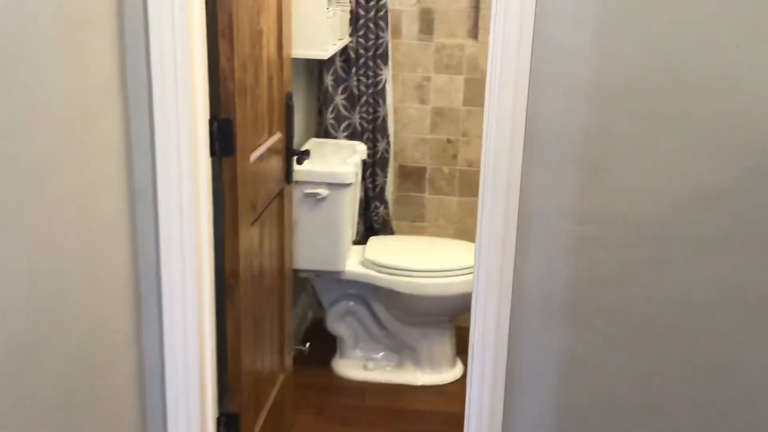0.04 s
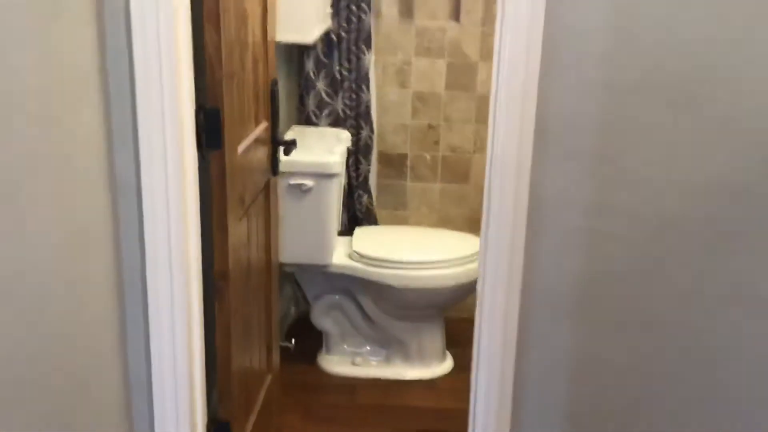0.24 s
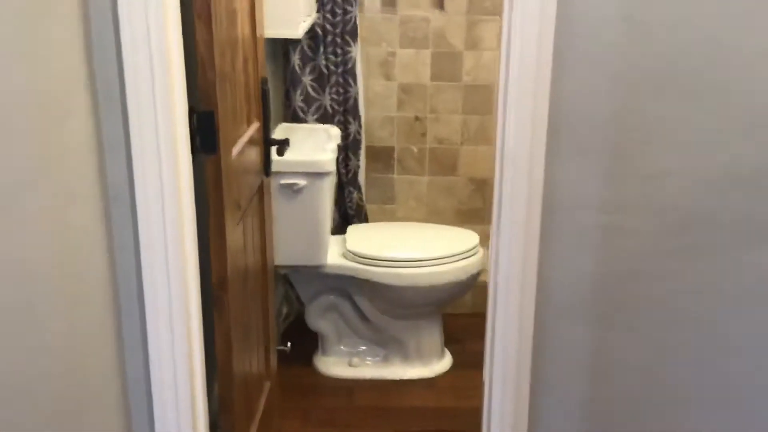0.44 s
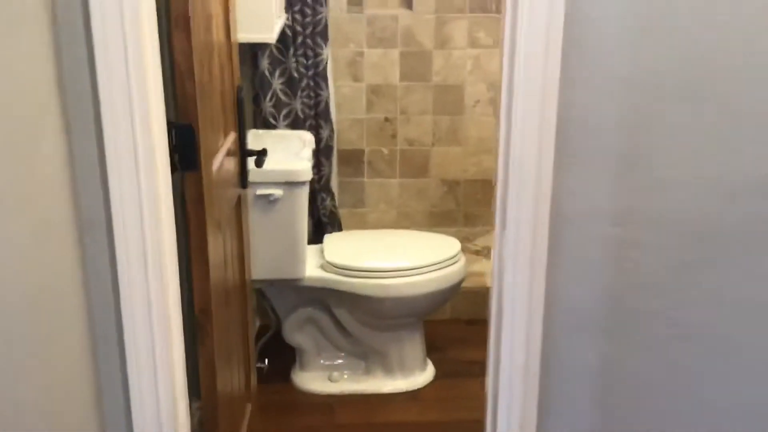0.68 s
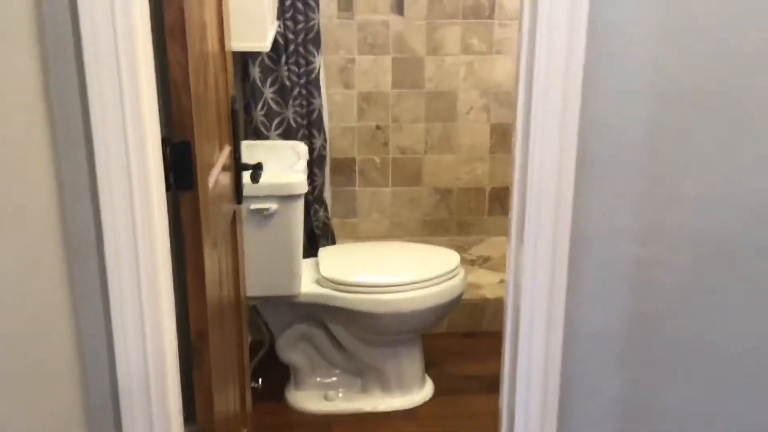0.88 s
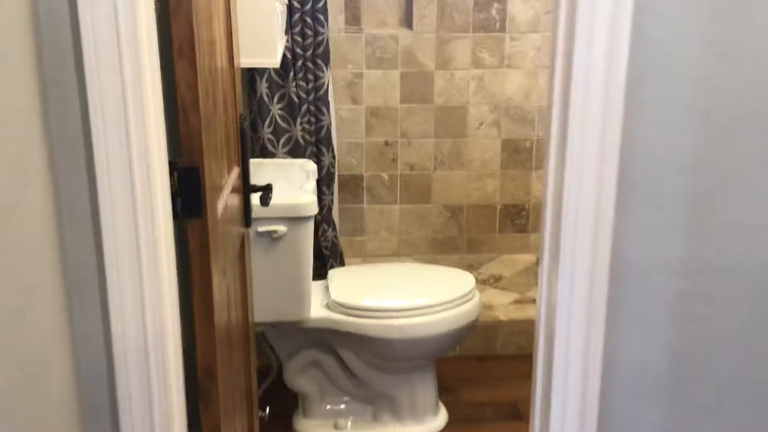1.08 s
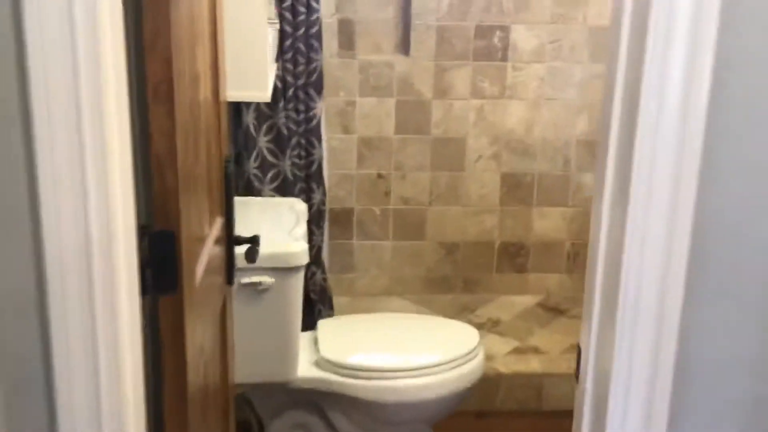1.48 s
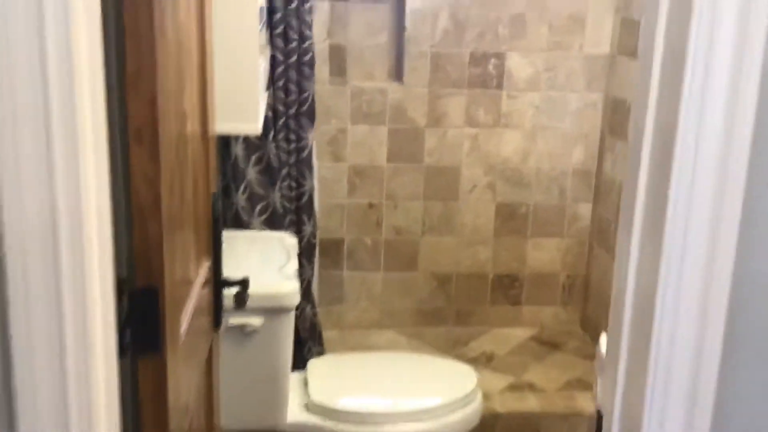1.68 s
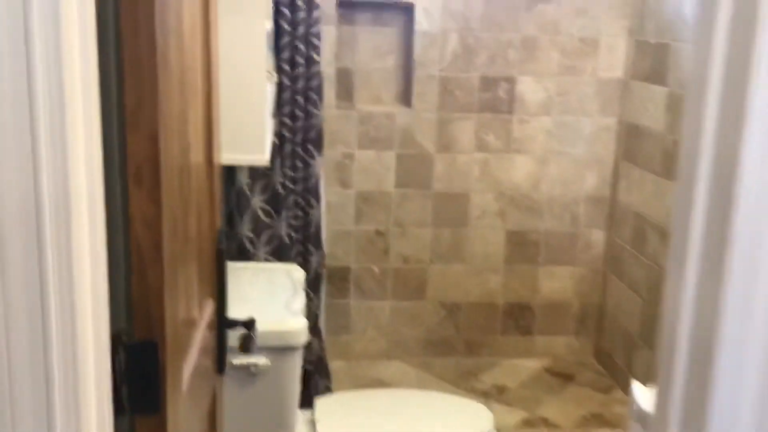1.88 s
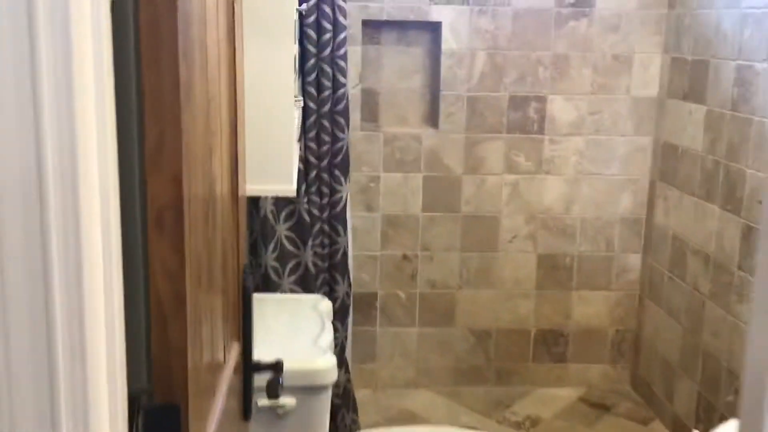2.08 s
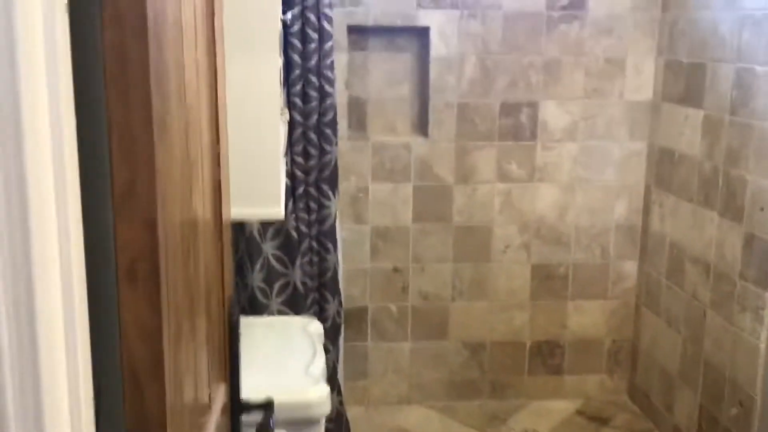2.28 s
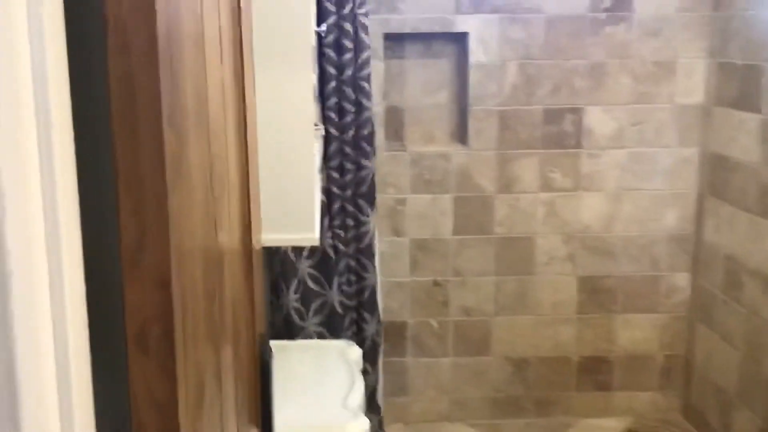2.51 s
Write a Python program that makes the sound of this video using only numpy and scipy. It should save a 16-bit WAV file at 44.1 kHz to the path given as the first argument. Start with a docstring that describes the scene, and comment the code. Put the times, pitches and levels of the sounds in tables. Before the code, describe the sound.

A few slow, booming steps on floorboards echo off bare walls, with light finger taps.

```python
"""Slow steps in an empty house

Three steps on a wooden floor: heel and ball make the boards boom, one board cracks,
and the bare walls ring on. Fingers tick and bump on a hand-held camera, dry and close.
Clothes rustle faintly over a low room rumble and a little microphone hiss."""
import sys
import numpy as np
from scipy import signal
from scipy.fft import rfft, irfft, next_fast_len
from scipy.io import wavfile

SR = 44100
rng = np.random.default_rng(int(sys.argv[2]) if len(sys.argv) > 2 else 0)


def wav_out(sig):
    """Save sig, one row per channel (or a flat mono array), as 16-bit PCM at SR to the path in sys.argv[1]."""
    wavfile.write(sys.argv[1], SR, np.round(np.clip(np.atleast_2d(sig).T, -1, 1) * 32767).astype(np.int16))


N = 116865


def amp(db):
    """Turn decibels into a gain."""
    return 10 ** (np.asarray(db) / 20)


def unit(x):
    """Scale a sound to an average (rms) level of 1."""
    return x / np.sqrt(np.mean(x ** 2) + 1e-20)


def along(points, hz):
    """Read between (frequency, value) points on a log frequency scale."""
    freqs, values = np.transpose(points)
    return np.interp(np.log(hz + 1), np.log(freqs + 1), values)


def add(track, start_s, sound):
    """Mix a sound into the track at a given time."""
    start = max(0, round(start_s * SR))
    part = sound[:N - start]
    track[start:start + len(part)] += part


def noise(tone, size):
    """Noise of level 1; the tone table sets the balance of lows and highs."""
    gain = amp(along(tone, np.fft.rfftfreq(size, 1 / SR)))
    return unit(irfft(rfft(rng.standard_normal(size)) * gain, size))


def rise(t, attack_s):
    """A smooth start."""
    return 1 - np.exp(-(t / attack_s) ** 2)


def fade(t, ring_s):
    """Die away by 60 dB in the ring time."""
    return np.exp(-np.log(1000) * t / ring_s)


def ring(notes, t, scatter_db=2):
    """Struck notes fade, with a new strength and phase at each hit."""
    out = np.zeros(len(t))
    for hz, db, ring_s in notes:
        gain = amp(db + scatter_db * rng.standard_normal())
        out += gain * np.sin(2 * np.pi * (hz * t + rng.random())) * fade(t, ring_s)
    return out


# tone of the hiss (frequency [Hz], level [dB])
HISS_TONE = [(2000, 2.5), (4200, 2), (5500, 0), (7500, -4), (8200, -2.5), (8750, -2.5), (9400, -3.5),
             (12000, -8), (15000, -15)]
# thin, high whines (pitch [Hz], level [dB])
WHINES = [(4620, -93.5), (8750, -95)]
def electronics(sharpness=55):
    """The microphone adds a steady hiss and a faint whine."""
    hz = np.fft.rfftfreq(N, 1 / SR)
    whine = np.zeros(N)
    for pitch, db in WHINES:
        narrow_band = 1 / (1 + (sharpness * (hz / pitch - 1)) ** 2)
        whine += amp(db) * unit(irfft(rfft(rng.standard_normal(N)) * narrow_band, N))
    return amp(-85.5) * noise(HISS_TONE, N) + whine


# tones of the quiet room and of the fading rumble (frequency [Hz], level [dB])
ROOM_TONE = [(20, -36.5), (32, -13), (45, -6), (70, 0.5), (110, -0.5), (200, -8.5), (330, -12.5),
             (500, -23), (800, -26), (1250, -28), (1900, -29.5), (2400, -32.5), (3000, -40), (4000, -41.5),
             (6000, -57.5)]
RUMBLE_TONE = [(20, -43), (32, -37.5), (45, -6), (75, 1.5), (130, -5.5), (280, -10), (450, -18), (900, -21),
               (3000, -63)]
def room_rumble():
    """The room murmurs steadily, and the house still rings from an earlier step."""
    t = np.arange(N) / SR
    rumble = amp(-59) * fade(t, ring_s=3.6) * noise(RUMBLE_TONE, N)
    return amp(-56) * noise(ROOM_TONE, N) + rumble


# how loud the clothes rustle (time [s], level [dB])
RUSTLE_LEVELS = [(0, -76.5), (.3, -72), (.44, -65), (.6, -71.5), (.9, -76), (1.08, -68.5), (1.5, -70),
                 (1.75, -79.5), (1.92, -62.5), (2.04, -64.5), (2.16, -64), (2.32, -71.5), (2.48, -64),
                 (2.62, -78.5)]
# tone of the cloth (frequency [Hz], level [dB])
CLOTH_TONE = [(200, 7), (700, 7.5), (1200, 0.5), (1900, 5.5), (2800, -4.5), (4400, -12.5), (6000, -20),
              (9000, -26.5), (15000, -42)]
def clothes():
    """Clothes rustle as they move with the stride."""
    level_db = np.interp(np.arange(N) / SR, *np.transpose(RUSTLE_LEVELS))
    return amp(level_db) * noise(CLOTH_TONE, N)


def case_pulse(tone, path=1, size=8192):
    """A tap travels a share of the path through the camera's case; the bass arrives last."""
    hz = np.fft.rfftfreq(size, 1 / SR)
    bass_hz, bass_delay_s, case_hz, width_hz = 79.3, 0.01985, 1890, 460
    travel_s = bass_delay_s * (bass_hz / np.maximum(hz, bass_hz / 2)) ** 0.676
    held_s = .0018 / (1 + ((hz - case_hz) / width_hz) ** 2)  # the case holds back its own note
    delay_s = path * (travel_s - travel_s[-1] + held_s)
    phase = 2 * np.pi * np.cumsum(delay_s) * SR / size
    pulse = irfft(amp(along(tone, hz)) * np.exp(-1j * phase))
    return np.fft.fftshift(pulse) / np.abs(pulse).max()  # centred, with a peak of 1


# tones of a pad's thump, a nail's tick and its sharp edge (frequency [Hz], level [dB])
THUMP_TONE = [(15, -64), (28, 13), (42, -8.5), (70, 8.5), (95, 6), (140, -11), (280, -13), (450, -34.5),
              (1000, -52), (3000, -96)]
TICK_TONE = [(50, -23), (200, 0), (550, 2.5), (1000, -2.5), (1800, 0.5), (2400, -9), (4000, -26.5),
             (6000, -53), (13000, -92)]
EDGE_TONE = [(500, -30), (2000, -6), (3300, 0), (4900, -1), (5800, -12), (7500, -14), (9200, -14),
             (12500, -25), (14500, -42)]
# finger touches (time [s], thump [dB], tick [dB], sharp edge [dB])
FINGER_TOUCHES = [(.2620, -55, -37.5, -49), (.9640, -50.5, -54, -76), (1.3358, -61, -40.5, -55),
                  (1.481, -37.5, -60, -93), (1.5056, -63, -52.5, -86), (1.963, -34, -40, -56),
                  (1.9802, -55, -45, -53.5), (2.1919, -41.5, -38.5, -48), (2.2136, -30, -29.5, -45),
                  (2.2495, -47.5, -46.5, -65), (2.2814, -25, -52, -83.5), (2.3642, -39.5, -48.5, -72),
                  (2.3918, -46, -46, -83), (2.4410, -46.5, -51, -64)]
def fingers():
    """Fingers shift on the camera: pads thump, nails tick and rattle the case, with no room echo."""
    out, t = np.zeros(N), np.arange(SR // 20) / SR
    thump, edge = case_pulse(THUMP_TONE), case_pulse(EDGE_TONE, path=0.299)
    first_tick = amp(-8.5) * case_pulse(TICK_TONE, path=0.241)  # takes a short cut
    tick = first_tick + case_pulse(TICK_TONE)
    centre_s = len(tick) / SR / 2
    for start_s, thump_db, tick_db, edge_db in FINGER_TOUCHES:
        click = amp(tick_db) * tick + amp(edge_db) * edge
        bounces = rng.standard_normal(len(t)) * fade(t, ring_s=0.052)  # inside the case
        rattle = signal.fftconvolve(click, bounces / np.linalg.norm(bounces))[:len(tick)]
        add(out, start_s - centre_s, amp(thump_db) * thump + click + amp(-5.5) * rattle)
    return out


# how long the bare rooms ring (frequency [Hz], ring time [s])
WALL_RING_TIMES = [(60, 0.99), (250, 0.63), (700, 0.74), (1800, 0.93), (4000, 0.88), (10000, 0.42)]
def echo(tone):
    """Sound bounces between bare walls for one second; the treble dies first."""
    hz, t, bands = signal.stft(noise(tone, SR), SR, nperseg=512)
    bands *= fade(t, along(WALL_RING_TIMES, hz)[:, None])
    return signal.istft(bands, SR, nperseg=512)[1][:SR]


# notes of a snapping board and of wooden panels (pitch [Hz], level [dB], ring time [s])
SNAP_NOTES = [(560, -13.5, 0.0047), (833, -12, 0.02), (1680, 4, 0.0095), (2390, -4, .005),
              (3210, -8, 0.0051), (4300, -14.5, 0.0047)]
PANEL_NOTES = [(452, -17, 0.17), (514, -3.5, 0.38), (573, -15.5, 0.6), (763.4, -8.5, 0.89),
               (894, -22.5, 0.31)]
# tones of a woody knock and a bright crack (frequency [Hz], level [dB])
KNOCK_TONE = [(60, -49.5), (150, -3), (330, 1.5), (550, 1), (850, -6.5), (1200, -12), (2000, -21.5),
              (5000, -68.5)]
CRACK_TONE = [(200, 17.5), (700, -29), (1200, -11.5), (1700, 5), (2300, 0), (3000, -10.5), (4300, -21),
              (5500, -42.5), (9000, -81), (15000, -94)]
# sole slaps and board cracks (time [s], knock [dB], crack [dB], snap [dB])
SLAPS_AND_CRACKS = [(.149, -65, -80, -59), (.2020, -59, -57, -49.5), (0.226, -60, -57.5, -59),
                    (.329, -55.5, -61, -54), (.360, -62, -62, -62), (.695, -66.5, -83, -61),
                    (.966, -59, -78, -83), (1.030, -65.5, -72, -66), (1.062, -63.5, -86, -66),
                    (1.1598, -49.5, -46, -31), (1.184, -49.5, -51, -37), (1.8705, -58, -71, -63),
                    (2.429, -65, -68, -72)]
def slaps_and_cracks():
    """Soles slap and boards crack: a quick snap, then the panels and walls ring on."""
    out, t = np.zeros(N), np.arange(SR) / SR
    snap = sum(amp(db) * np.sin(2 * np.pi * hz * t) * fade(t, ring_s) for hz, db, ring_s in SNAP_NOTES)
    early_boost = 1 + amp(4.5) * fade(t, ring_s=0.084)  # the first echoes are the strongest
    for start_s, knock_db, crack_db, snap_db in SLAPS_AND_CRACKS:
        knock = amp(knock_db) * (echo(KNOCK_TONE) + ring(PANEL_NOTES, t))
        crack = amp(crack_db) * echo(CRACK_TONE)
        hit = amp(snap_db) * snap + (knock + crack) * early_boost
        add(out, start_s, hit * rise(t, attack_s=.0003))
    return out


# deep notes of the floor and room (pitch [Hz], level [dB], ring time [s])
BOOM_NOTES = [(60.7, -5, 1.9), (73.8, 1.5, 1.0), (103.5, -1, 1), (133, -8, 0.94), (145.2, -6.5, 0.51),
              (176, -9.5, 0.62), (185.8, -2, 0.25), (225, -23.5, 0.44), (277.5, -11, 0.94),
              (307.7, -10.5, 1.8), (368.7, -2, 0.94)]
# tone of the boom's echo (frequency [Hz], level [dB])
BOOM_TONE = [(20, -51), (32, -26), (48, -2.5), (80, -9), (130, 0), (200, 1), (300, -7.5), (450, -21.5),
             (800, -31), (2000, -73.5)]
# heel and ball landings (time [s], thud [dB], thud pitch [Hz], thud ring time [s], boom [dB])
FOOT_LANDINGS = [(.206, -22.5, 183, 0.072, -40), (.208, -34.5, 291, 0.29, -51),
                 (.270, -28, 147.6, 0.23, -46), (0.398, -42, 142.9, 0.55, -53),
                 (0.646, -41, 86.6, 0.12, -60), (1.028, -39.5, 212.3, 0.18, -45),
                 (1.084, -39, 106.8, 0.45, -53.5), (1.163, -25, 323, 0.04, -47),
                 (1.214, -35, 87.4, 0.31, -45), (1.346, -35.5, 101, .13, -66.5),
                 (1.790, -54, 148.4, 0.33, -58.5), (1.870, -35.5, 127, 0.43, -51.5),
                 (1.892, -31.5, 84.7, 0.43, -59), (1.954, -27.5, 74.9, 0.18, -48)]
def footfalls():
    """Each footfall bends the boards with a thud, and the floor and the room boom."""
    out, t = np.zeros(N), np.arange(SR) / SR
    for start_s, thud_db, hz, ring_s, boom_db in FOOT_LANDINGS:
        thud = np.sin(2 * np.pi * hz * t) * fade(t, ring_s) * rise(t, attack_s=0.0031)
        boom = (.5 * ring(BOOM_NOTES, t) + amp(2.5) * echo(BOOM_TONE)) * rise(t, attack_s=0.0027)
        add(out, start_s, amp(thud_db) * thud + amp(boom_db) * boom)
    return out


def scene():
    """All the sounds meet at one microphone."""
    background = clothes() + room_rumble() + electronics()
    return (background + footfalls() + slaps_and_cracks() + fingers())[None]


def record(dry):
    """The camera drops the deepest bass and the highest treble."""
    bottom_hz, top_hz = 35.2, 15100
    size = next_fast_len(N + SR // 2)
    hz = np.fft.rfftfreq(size, 1 / SR)
    low_cut = 1 - np.exp(-(hz / bottom_hz) ** 4)
    return irfft(rfft(dry, size) * low_cut * (hz < top_hz), size)[:, :N]


dry = scene()
out = record(dry)
wav_out(out)
```